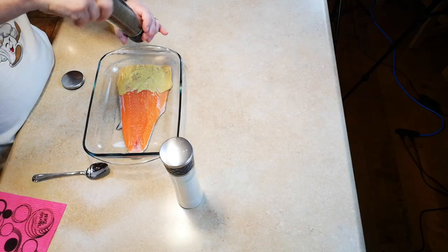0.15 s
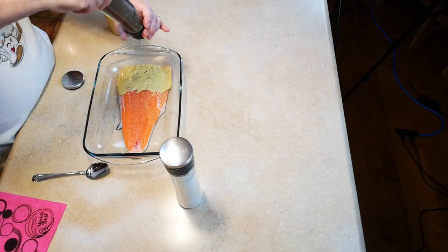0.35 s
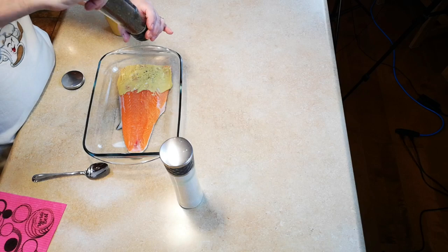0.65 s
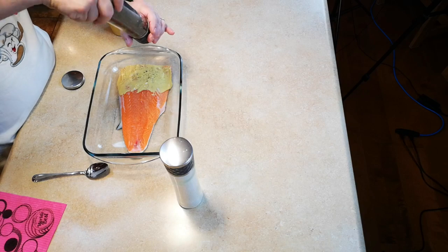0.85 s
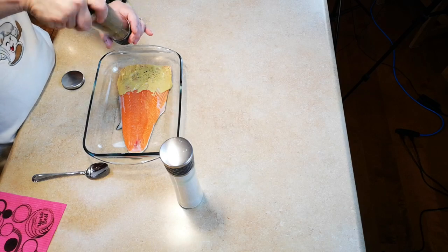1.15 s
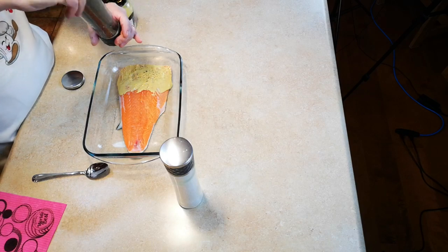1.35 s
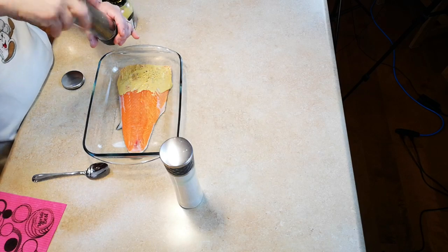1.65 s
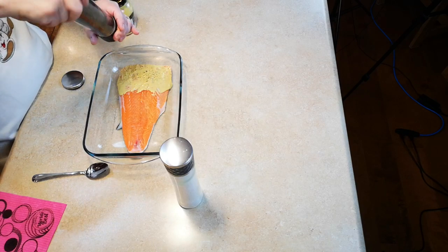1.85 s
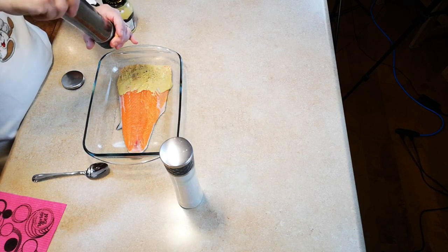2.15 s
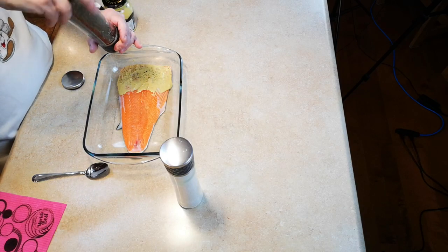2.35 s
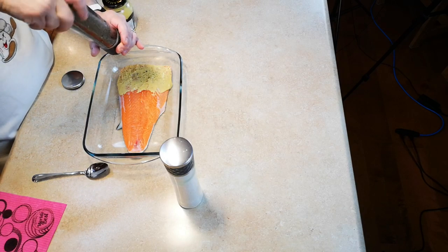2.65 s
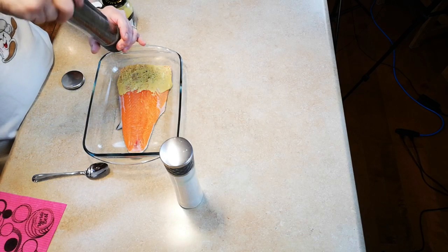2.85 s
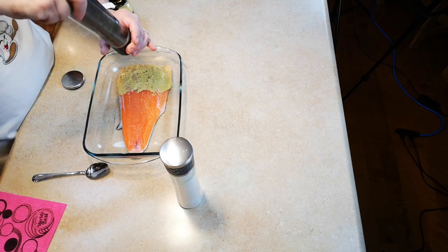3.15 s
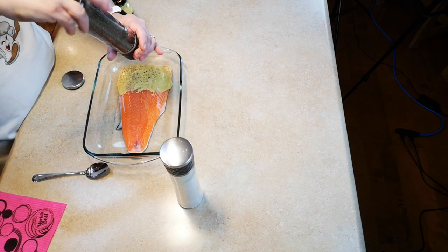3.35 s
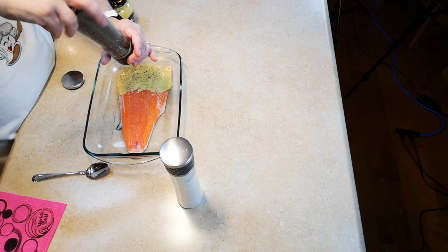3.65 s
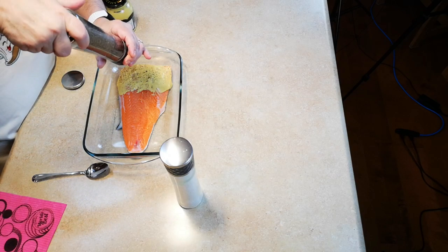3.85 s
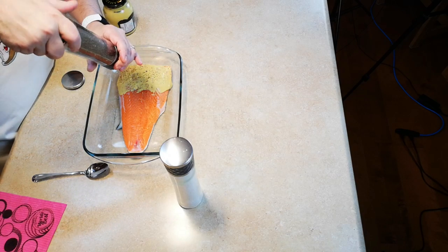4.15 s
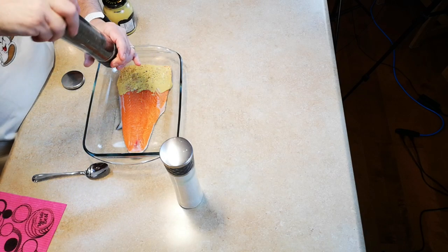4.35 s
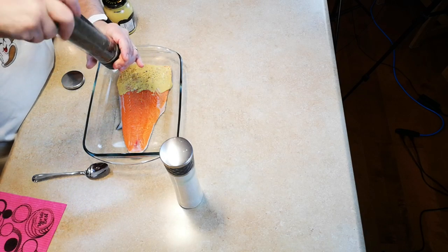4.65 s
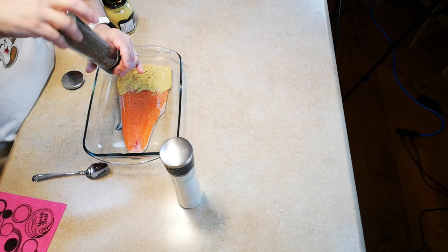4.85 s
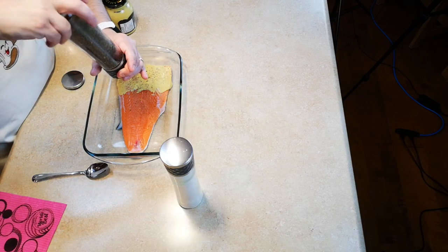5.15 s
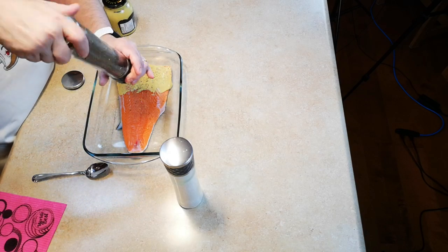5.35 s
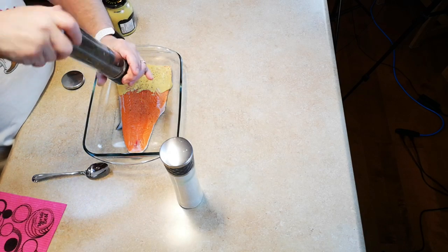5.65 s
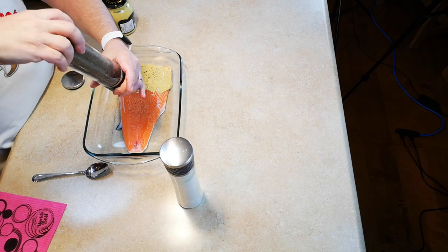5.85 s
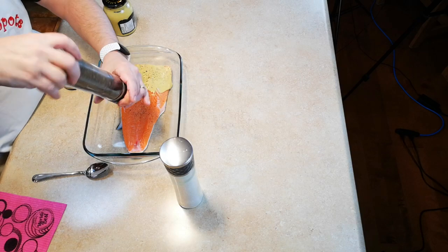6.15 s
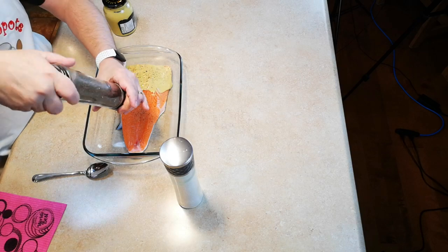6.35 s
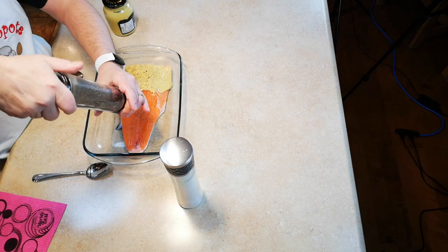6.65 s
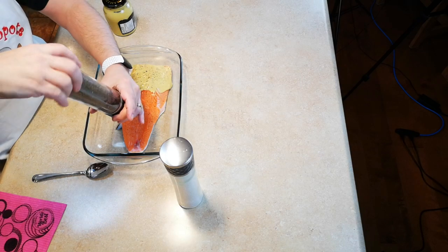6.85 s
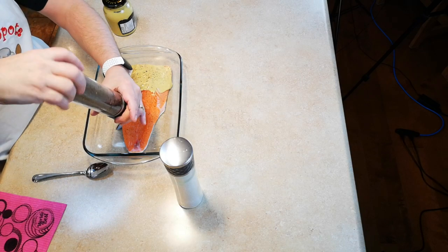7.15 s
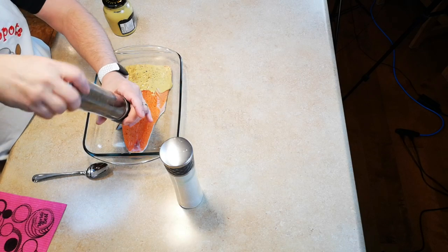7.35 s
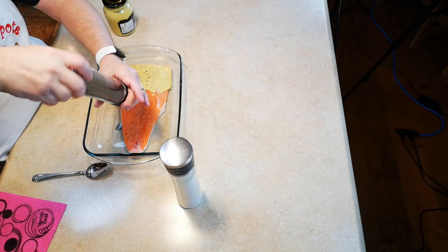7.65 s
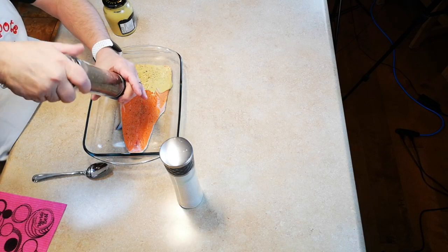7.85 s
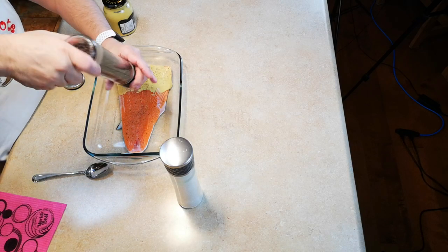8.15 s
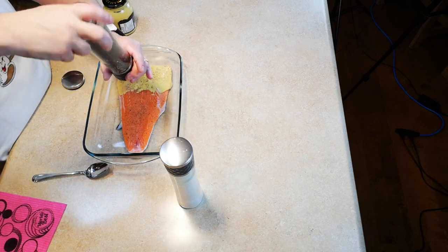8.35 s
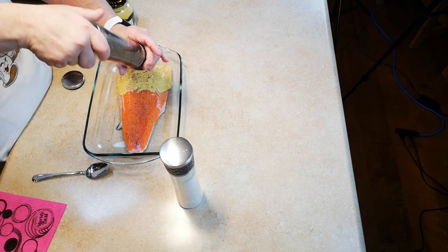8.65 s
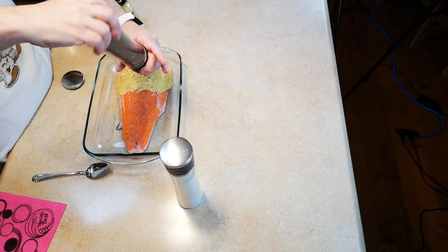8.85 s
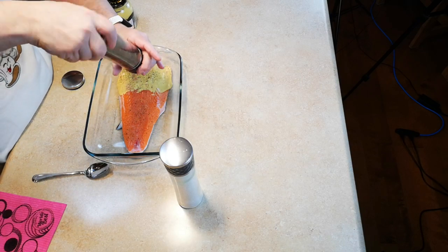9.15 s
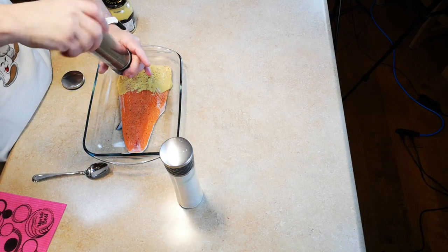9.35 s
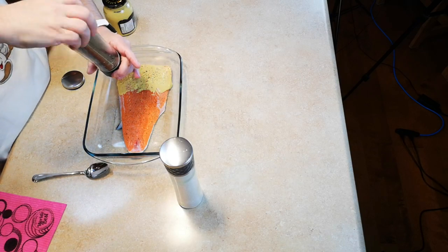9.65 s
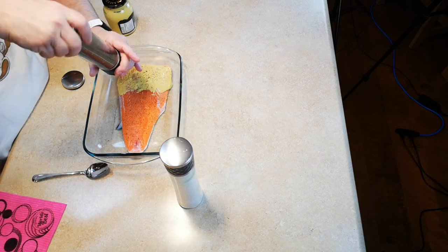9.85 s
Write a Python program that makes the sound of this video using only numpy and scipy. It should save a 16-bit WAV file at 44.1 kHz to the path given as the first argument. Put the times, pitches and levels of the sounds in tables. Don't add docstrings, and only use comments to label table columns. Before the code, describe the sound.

Close, dry, rhythmic rasps of a pepper grinder in a small kitchen, peppered with brittle snaps, faint grit hiss and soft counter bumps.

```python
import sys
import numpy as np
from scipy import signal
from scipy.fft import rfft, irfft, next_fast_len
from scipy.io import wavfile
from scipy.ndimage import uniform_filter1d

SR = 44100
rng = np.random.default_rng(int(sys.argv[2]) if len(sys.argv) > 2 else 0)


def generate_wav(signal):
    frames = np.transpose(np.atleast_2d(signal))
    scaled = np.clip(frames, -1, 1) * 32767
    pcm = np.round(scaled).astype(np.int16)
    wavfile.write(sys.argv[1], SR, pcm)


def voltage_ratio(decibels):
    exponent = np.asarray(decibels, float) / 20
    return 10 ** exponent


N = 440559

# (time [s], rise [s], hold [s], effort [dB])
TWISTS = [(0.007, 0.00083, 0.053, -34), (0.342, 0.04, 0.071, -33.5), (0.711, 0.059, 0.03, -32.5),
          (1.11, 0.0026, 0.066, -31), (1.459, 0.052, 0.063, -31), (1.828, 0.049, 0.047, -31),
          (2.177, 0.021, 0.045, -29), (2.506, 0.044, 0.056, -29.5), (2.842, 0.029, 0.074, -32),
          (3.166, 0.033, 0.064, -32.5), (3.486, 0.058, 0.029, -31.5), (3.795, 0.036, 0.038, -27),
          (4.092, 0.028, 0.077, -32.5), (4.392, 0.017, 0.088, -34.5), (4.677, 0.048, 0.038, -30),
          (4.965, 0.021, 0.017, -32.5), (5.261, 0.038, 0.06, -30.5), (5.645, 0.054, 0.05, -30),
          (5.978, 0.018, 0.054, -29.5), (6.286, 0.018, 0.064, -26), (6.588, 0.023, 0.037, -17.5),
          (6.903, 0.033, 0.042, -28), (7.205, 0.028, 0.046, -27.5), (7.51, 0.014, 0.077, -30.5),
          (7.807, 0.036, 0.043, -31), (8.121, 0.021, 0.0056, -33.5), (8.596, 0.04, 0.037, -28.5),
          (9.001, 0.0087, 0.075, -27), (9.356, 0.063, 0.024, -28), (9.717, 0.032, 0.044, -30.5)]
# (time [s], rise [s], hold [s], effort [dB])
REGRIPS = [(5.034, 0.0014, 0.0052, -25.5), (5.464, 0.044, 0.02, -34), (5.805, 0.061, 0.025, -29.5),
           (6.124, 0.027, 0.023, -33), (6.454, 0.0016, 0.059, -38.5), (6.74, 0.0025, 0.088, -40.5),
           (7.048, 0.0024, 0.065, -45), (7.35, 0.0088, 0.089, -45), (7.654, 0.031, 0.078, -47),
           (7.992, 0.0026, 0.062, -44.5), (8.228, 0.002, 0.018, -57), (8.557, 0.0074, 0.018, -48.5),
           (8.784, 0.023, 0.068, -48), (8.85, 0.0029, 0.0052, -39), (9.169, 0.042, 0.022, -40.5),
           (9.251, 0.027, 0.035, -45), (9.565, 0.012, 0.053, -40.5), (9.883, 0.026, 0.13, -46)]
# (time [s], hollow over bright [dB])
GRIP = [(0, 0), (.4, 2), (1.1, 3), (1.5, -2), (3.2, 1), (4.1, 0), (4.4, 3.5), (4.9, 2.5), (5.1, 0.5),
        (5.5, 2), (6.3, 2), (6.6, 2), (7.5, 3), (8.1, 6.5), (8.6, 3), (9.1, -2), (9.4, 5), (9.99, 0.5)]
# (frequency [Hz], density [dB per Hz])
SCRAPE = [(200, -22.5), (480, 0), (1200, -0.5), (3300, 0.5), (4300, 7), (6200, -10), (14000, -13.5)]
# (frequency [Hz], width [Hz], level [dB])
HOLLOW_MODES = [(420, 200, -23), (737, 200, -8), (1180, 220, -5), (1870, 98, -9.5), (2450, 300, -3),
                (2760, 96, -11)]
# (frequency [Hz], width [Hz], level [dB])
BURR_MODES = [(3740, 163, -9.5), (4100, 460, -1), (5010, 620, -1.5), (5050, 640, -14.5), (6380, 1200, -5.5)]
# (frequency [Hz], width [Hz], level [dB])
SHELL_MODES = [(7750, 2260, 10), (9600, 1200, -4), (13560, 1470, 8.5)]
# (time [s], peak [dB], ring [Hz], brightness [dB], second ring [Hz])
SPLITS = [(0.0105, -12, 4150, -5, 1260), (0.413, -14, 3530, -14, 2560), (0.4373, -15.5, 4030, -11, 2900),
          (0.7972, -14.5, 1250, -22, 1640), (1.1091, -3, 4430, -7.5, 1140), (1.522, -13.5, 4140, -22, 6040),
          (1.878, -15, 1300, -10, 2450), (2.2223, -13.0, 3620, -15, 2400), (2.525, -16, 2610, -22, 3900),
          (2.586, -11, 4160, -16, 2560), (3.254, -13, 4700, -12, 2820), (3.8404, -8.5, 2600, -18, 4340),
          (3.8562, -12, 2530, -15, 3890), (4.7528, -13, 3700, -9, 2040), (5.0359, -2, 2450, -8, 1090),
          (5.7133, -12, 5070, -11, 2450), (6.0114, -12, 3740, -7, 2580), (6.2988, -7, 2510, -13, 5600),
          (6.3037, -12, 1980, -14, 2730), (6.3331, -13, 1440, -9, 1050), (6.354, -8.5, 1580, -9, 3900),
          (6.3572, -8.5, 4140, -15, 1810), (6.3652, -6.5, 2570, -21, 4260), (6.5966, -5, 4140, -11, 5720),
          (6.6053, -11, 2370, -17, 4780), (6.6181, -1.5, 3900, -12, 1890), (6.625, -11, 2200, -6, 5160),
          (6.6309, -1, 2200, -8, 5270), (6.6465, -9.0, 4710, -9, 3380), (6.9347, -7, 5340, -14, 880),
          (6.9409, -11, 4000, -18, 2930), (6.9528, -9.5, 4300, -10, 2310), (7.2331, 1.5, 4100, -11.5, 2570),
          (7.2401, -11, 4050, -12, 2290), (7.246, -4.0, 4630, -12, 1900), (7.2513, -8.5, 4670, -4, 2820),
          (7.5493, -11, 2400, -17, 5010), (8.6015, 3.5, 4040, -7.5, 2220), (9.4287, -13.5, 1870, -9, 1290),
          (9.7534, -5, 3930, -17, 1680)]
# (time [s], peak [dB], ring [Hz], brightness [dB])
PIECES = [(1.5335, -16, 4200, -17), (1.5433, -19, 4100, -11), (2.2, -14, 2600, -11), (2.53, -17, 4030, -21),
          (2.5464, -19, 4170, -22), (2.554, -14.5, 2460, -20), (2.559, -17.5, 2460, -20),
          (2.5687, -13.5, 4150, -17), (2.576, -15, 3870, -13), (2.5787, -14.0, 2660, -15),
          (2.5987, -20, 2840, -13), (3.5312, -17, 2920, -11), (3.538, -19.5, 2190, -11),
          (3.846, -13, 2690, -17), (3.8508, -10.5, 2410, -14), (3.862, -15.5, 2600, -14),
          (3.8712, -19, 4280, -12), (4.73, -18, 2060, -25), (4.9966, -15, 1060, -17),
          (5.0504, -15, 3900, -2), (5.3017, -20, 2930, -16), (5.3101, -18, 5140, -19),
          (5.328, -18.0, 4220, -10), (5.3545, -17.5, 4350, -15), (5.515, -15.5, 5300, -21),
          (5.523, -18.5, 2470, -20), (5.6737, -17.5, 4050, -7), (5.682, -16, 2470, -14),
          (5.8849, -17, 2460, -2.5), (6.1644, -19.0, 2570, -10), (6.6376, -22, 2450, -10),
          (6.9455, -12, 4200, -15), (6.9729, -19, 4110, -8), (7.2204, -17, 4300, -14),
          (7.5543, -15.5, 1070, -8), (7.583, -17, 5120, -11), (7.8397, -19, 3700, -2),
          (7.8791, -22, 2360, -4), (8.645, -12, 4100, -17), (8.6547, -20, 4000, -14),
          (9.0151, -11, 4050, -23), (9.0291, -25, 3870, -18), (9.0431, -11, 4220, -16),
          (9.055, -16, 4830, -5), (9.0631, -16.0, 5140, -7), (9.0766, -15, 4190, -17),
          (9.747, -17.5, 3530, -3), (9.763, -20, 4700, -21), (9.8078, -15.5, 4130, -13),
          (9.8127, -15.5, 4270, -18)]
# (time [s], peak [dB], ring [Hz], brightness [dB])
CHIPS = [(0.038, -20, 4200, -14), (0.3883, -24, 2950, -6), (0.7696, -18, 3890, -11),
         (0.7753, -17.5, 1300, -12), (0.79, -18.5, 1780, -15), (1.506, -20.0, 4130, -21),
         (1.5137, -20.0, 4260, -14), (1.901, -20.0, 2970, -17), (1.9103, -19.5, 3660, -17),
         (2.208, -18.0, 2510, -14), (2.2137, -16.0, 3550, -17), (2.2426, -20, 4100, -18),
         (2.9326, -21, 1920, -14), (2.9447, -25, 4520, -5), (3.547, -19.0, 4500, -16),
         (3.5797, -15.5, 5460, -11), (4.157, -21, 4650, -15), (4.162, -17, 4600, -16),
         (4.7353, -19.0, 2190, -17), (4.7422, -21, 2430, -17), (5.691, -17, 2700, -12),
         (5.7022, -19, 2530, -14), (5.7078, -19, 4040, -20), (5.87, -18, 2430, -15),
         (5.8744, -20.5, 4260, -5), (5.9866, -20, 4170, -17), (5.9905, -20.5, 4150, -16),
         (6.0071, -18, 4760, -5.5), (6.028, -18.5, 4370, -12), (6.1607, -18, 2540, -16),
         (6.292, -15, 4060, -9), (6.3106, -26, 4170, -10), (6.3234, -26, 4000, -9), (6.96, -20, 4200, -6),
         (7.274, -22, 2650, -9), (7.294, -24, 960, -12), (7.5448, -18, 4090, -16), (7.852, -21.5, 4000, -7),
         (8.6222, -17.5, 2060, -16), (8.6334, -18, 1080, -14), (8.662, -17, 4470, -16),
         (9.0046, -19.5, 4170, -5), (9.0184, -16, 4170, -17), (9.0317, -17, 1200, -17),
         (9.068, -22, 5420, -13), (9.2225, -21, 3540, -16), (9.4118, -19, 3820, -8),
         (9.422, -19.0, 1160, -10), (9.7734, -18, 5100, -16), (9.7927, -24, 1310, -17)]
# (time [s], peak [dB], ring [Hz],
# brightness [dB])
TICKS = [(0.2061, -49.5, 4780, 17), (0.559, -30, 3380, -6), (0.7132, -33, 2340, -11), (1.336, -46, 4400, 3),
         (1.866, -22, 2400, -17), (2.057, -45, 5430, 11), (2.8372, -29.5, 4100, -13),
         (3.1874, -23, 2770, -9), (3.43, -44, 5530, 4), (3.5254, -22, 2660, -10), (3.9248, -36, 4190, 1),
         (4.1155, -25, 4450, 5), (4.3857, -27, 4240, -21), (4.982, -27, 890, -18), (5.2813, -26, 2670, -15),
         (5.648, -23, 4130, -8), (5.996, -26, 2410, -11), (7.227, -8, 4300, -14), (7.5311, -16, 4080, -9),
         (8.13, -29, 4000, 2), (8.1473, -22, 4000, -16), (8.359, -41, 834, -15), (0.7537, -27, 2430, 5),
         (8.5752, -28, 4220, -21), (8.853, -21.5, 3770, -4), (9.009, -20.5, 4050, 3),
         (9.2129, -21, 4500, -18), (9.229, -22, 3620, -12), (9.5484, -25, 4000, -20),
         (1.1166, -15, 4200, -6), (6.757, -29, 2500, -14), (6.765, -28, 4200, -12), (6.775, -25, 2600, -12),
         (6.848, -29, 4500, -8), (7.058, -27, 4800, -12), (7.142, -30, 4800, -6), (2.89, -30, 5200, -14),
         (2.907, -24, 4000, -14),
         (0.054, -28, 4300, -10), (0.3172, -47, 3440, 6), (1.0223, -50, 3700, 8), (1.414, -47, 2900, 3),
        (1.4745, -29, 4780, -5), (1.4907, -26, 5510, -14), (1.7821, -46, 5230, 0), (2.1345, -55, 3250, 2),
        (2.1388, -54, 4570, 4), (2.1616, -40.5, 2450, -8), (2.4735, -44, 5010, 9), (2.5151, -27, 3070, -15),
        (2.7872, -45, 5100, 3), (3.1943, -24, 810, -12), (3.4653, -38, 5270, 6), (4.0029, -38, 6110, 3.5),
        (4.4882, -27, 1126, -19), (4.503, -26, 4280, 0), (4.574, -40, 5360, 5), (4.6457, -43, 5270, -1),
        (4.695, -25, 2680, -11), (4.992, -17, 2900, -19), (5.238, -46, 1070, 9), (5.6512, -22, 2540, -13),
        (5.808, -30, 2630, -11), (6.4639, -25, 3530, -11), (6.5055, -26, 2140, -10),
        (7.8103, -27.5, 4730, -7), (8.1505, -33, 2750, -15), (8.401, -40, 5510, 3), (8.4975, -47, 4880, 12),
        (8.5702, -28, 4100, -12), (8.861, -23.5, 3830, -12), (8.9462, -37, 1420, -14),
        (9.1918, -24, 3500, -13), (9.3546, -26, 4040, -12), (9.372, -29, 1830, 6),
        (9.7146, -29.5, 2880, -14), (9.722, -29.5, 3600, -11), (9.9053, -32, 1890, -13)]
# (frequency [Hz], density [dB per Hz])
HISS = [(1500, -7), (2500, 3.5), (5000, 6.5), (7600, 2.5), (8500, 9), (9400, 6), (16000, -4)]
# (time [s], steady trickle [dB], shake by a stroke [dB])
TILT = [(0, -62, -40.5), (1, -58.5, -37), (2.1, -58.5, -40), (2.8, -55.5, -39), (4.002, -54, -38),
        (4.4, -61, -39.5), (5.2, -58, -39.5), (5.6, -53, -43.5), (6.1, -46, -40), (7.2, -42.5, -51),
        (7.351, -47, -43), (8.1, -47.5, -46), (8.26, -45, -71), (8.35, -61, -45), (8.45, -42, -67),
        (8.59, -61, -38), (9.3, -48, -45), (9.99, -75, -41)]
# (frequency [Hz], time to fall 60 dB [s])
KITCHEN_T60 = [(250, 0.62), (2000, 0.42), (15000, 0.23)]
# (frequency [Hz], density [dB per Hz])
AIR = [(30, 0.5), (70, -5.5), (150, -10), (400, -25.5), (5000, -36), (16000, -64)]
# (frequency [Hz], density [dB per Hz])
RUMBLE = [(3, -1.5), (7, 9), (11, 11), (16, -14), (24, -0.5), (45, -50.5)]
# (time [s], length [s], start pitch [Hz], end pitch [Hz], level [dB], load [ratio])
CREAKS = [
    (.322, .032, 700, 480, -52, .2),
    (1.058, .054, 503, 518, -43.5, 1.1),
    (3.476, .036, 820, 380, -48, .2),
    (3.499, .022, 900, 600, -49, .1),
]
# (time [s], peak [dB])
BUMPS = [
    (5.143, -21.5),
    (5.42, -24),
    (6.136, -27),
    (6.473, -32),
    (7.049, -24),
    (7.218, -40),
    (7.337, -29),
]
# (frequency [Hz], gain [dB])
MICROPHONE = [(7000, -2), (8300, 0), (9000, -2), (10900, -3), (12400, 0), (13600, 0.5), (14200, -21),
              (15700, -0.5)]
# (frequency [Hz], readiness to drop out [spreads of need])
DROPPED_TREBLE = [(9000, -1.4), (9800, -1.1), (10700, -.5), (11600, -1.1), (13800, -1.2), (14400, -.1),
                  (15000, .8), (15600, -.3)]


def evened(x):
    return x / np.sqrt(np.mean(x ** 2) + 1e-20)


def read(points, hz):
    f, value = np.transpose(points)
    return np.interp(np.log(hz + 1), np.log(f + 1), value)


def add(mix, s, sound):
    part = mix[round(s * SR):][:len(sound)]
    part += sound[:len(part)]


def coloured(spectrum):
    size = next_fast_len(N)
    white = rfft(rng.standard_normal(size))
    gain = voltage_ratio(read(spectrum, np.fft.rfftfreq(size, 1 / SR)))
    return evened(irfft(white * gain, size)[:N])


def wander(ms):
    size = max(round(ms * SR / 1000), 1)
    drift = uniform_filter1d(rng.standard_normal(N), size)
    return evened(uniform_filter1d(drift, size))


def patchy(x, spread_db):
    z = signal.stft(x, nperseg=256)[2]
    patches = uniform_filter1d(rng.standard_normal(z.shape), size=4, axis=0)
    patches = evened(uniform_filter1d(patches, size=8, axis=1))
    gain = voltage_ratio(spread_db * np.minimum(patches, 1.2))
    return evened(signal.istft(z * gain, nperseg=256)[1][:N])


def ring(modes, stretch, spread_db):
    t = np.arange(600) / SR
    hz, width, db = np.transpose(modes)[:, :, None]
    struck = voltage_ratio(db + spread_db * rng.uniform(-0.59, 1, hz.shape)) * rng.choice([-1, 1], hz.shape)
    width = np.maximum(width, 230)
    decay = np.exp(-np.pi * width * t) * np.minimum(t / .0001, 1)
    return (struck * decay * np.sin(2 * np.pi * hz * stretch * t)).sum(0)


def grains(modes, per_s, spread_db, count):
    strength = voltage_ratio(spread_db * np.minimum(rng.exponential(1, N), 1.6))
    clicks = strength * (rng.random(N) < per_s / SR)
    kind = rng.integers(0, count, N)
    total = np.zeros(N)
    for k in range(count):
        response = ring(modes, rng.uniform(1.0, 1.065), 7.1)
        total += signal.oaconvolve(clicks * (kind == k), response)[:N]
    return evened(total)


def grind():
    slips = voltage_ratio(5.5 * np.clip(wander(3), -3, 1))
    scrape = patchy(coloured(SCRAPE) * slips, spread_db=4)
    split_hz = 3150
    low = signal.sosfiltfilt(signal.butter(4, split_hz, fs=SR, output="sos"), scrape)
    hollow = voltage_ratio(-1.5) * low + voltage_ratio(-8.0) * grains(HOLLOW_MODES, per_s=600, spread_db=1.5, count=8)
    bright = voltage_ratio(-3.5) * (scrape - low) + voltage_ratio(-6.5) * grains(BURR_MODES, per_s=400, spread_db=1.0, count=6)
    return strained() * (effort() * [hollow, bright]).sum(0)


def effort():
    gain, splits = np.zeros((2, N)), np.transpose(SPLITS)[0]
    t = np.arange(SR // 2) / SR
    for strokes, fall_db_per_s in ((TWISTS, 420), (REGRIPS, 200)):
        for s, rise, hold, db in strokes:
            nearest = splits[np.argmin(abs(splits - s))]
            if rise < .005 and abs(nearest - s) < .02:
                s = nearest
            fall = fall_db_per_s + 16.6 * s
            shape = np.interp(t, [0, rise, rise + hold], [-17.5, 2, -2.5])
            shape = shape - fall * np.maximum(t - rise - hold, 0)
            hollow_db = np.interp(s, *np.transpose(GRIP)) - 0.18 * (db + 28.0)
            add(gain[0], s, voltage_ratio(db + hollow_db / 2 + shape))
            add(gain[1], s, voltage_ratio(db - hollow_db / 2 + shape))
    return gain


def strained():
    strain_s, strain_db = 0.0053, 0.5
    strain = np.zeros(N)
    for s, *_ in SPLITS + PIECES:
        add(strain, max(s - strain_s, 0), np.hanning(round(strain_s * SR) + 2) ** .5)
    return voltage_ratio(strain_db * np.minimum(strain, 1))


def crack(db, hz, bright_db, second_hz=None):
    t = np.arange(400) / SR
    snaps = 0.15 * np.clip(rng.standard_normal(400), -1.9, 1.9) ** 3 * np.exp(-t / 0.0032)
    snaps[0] = 1
    z = rfft(snaps, 2048)
    snaps = irfft(z / abs(z) ** .8)[:400] * np.exp(-t / .004)
    snaps = signal.lfilter([1, -1], [1, -.85], snaps)
    pitches = [(hz, 0)]
    if second_hz:
        pitches.append((second_hz, -5.5))
    parts = []
    for f, level in pitches:
        width = 263 + 0.08 * f
        parts.append((np.convolve(snaps, ring([(f, width, 0)], 1, 0)), level))
    near = [(f, width + 250, level - 1.9 * abs(np.log2(f / hz)))
            for f, width, level in HOLLOW_MODES + BURR_MODES]
    parts.append((np.convolve(snaps, ring(near + [(6820, 1430, -10)], 1, 1.1)), -2))
    body = sum(voltage_ratio(level) * part / abs(part).max() for part, level in parts)
    edge = np.convolve(snaps, ring(SHELL_MODES, 1, 3.0))
    return voltage_ratio(db) * (body / abs(body).max() + voltage_ratio(bright_db + 2.5) * edge / abs(edge).max())


def loose_corns():
    hiss = patchy(coloured(HISS) * voltage_ratio(2.0 * wander(4.0)), spread_db=2.5)
    ticks = grains(SHELL_MODES, per_s=1500, spread_db=2.5, count=5)
    return shaken() * (voltage_ratio(-1.5) * evened(hiss) + voltage_ratio(-5.5) * ticks)


def shaken():
    s, trickle_db, shake_db = np.transpose(TILT)
    power = voltage_ratio(2 * np.interp(np.arange(N) / SR, s, trickle_db))
    t = np.arange(SR // 2) / SR
    for start, rise, hold, db in TWISTS + REGRIPS:
        hold = hold + 0.03
        after = t - rise - hold
        shape = np.interp(t, [0, rise, rise + hold], [-12, -0.5, 0])
        shape -= 110 * np.maximum(after, 0)
        shape += -13 * np.clip((after - 0.092) / 0.017, 0, 1)
        level = np.interp(start, s, shake_db) + 0.51 * (db + 27.0)
        add(power, start, voltage_ratio(2 * (level + shape)))
    return np.sqrt(power)


def kitchen(x):
    taps = np.zeros(SR // 2)
    at = np.arange(250, SR // 2 - 20, 20)
    taps[at + rng.integers(0, 20, len(at))] = rng.choice([-1., 1.], len(at))
    hz, t, z = signal.stft(taps, SR, nperseg=256)
    decay = voltage_ratio(-60 * t / read(KITCHEN_T60, hz)[:, None])
    tail = signal.istft(z * decay, SR, nperseg=256)[1]
    return signal.oaconvolve(x, tail / np.linalg.norm(tail))[:N]


def still_air():
    return voltage_ratio(-49.5) * coloured(AIR) + voltage_ratio(-36.5) * coloured(RUMBLE)


def creak(length, start_hz, end_hz, db, load):
    u = np.arange(round(length * SR)) / (length * SR)
    hz = end_hz + (start_hz - end_hz) * (1 - u) ** 2
    unsteady = 1 + .08 * uniform_filter1d(rng.standard_normal(len(u)), size=100)
    phase = 2 * np.pi * (np.cumsum(hz * unsteady) / SR)
    overtones = sum(voltage_ratio(level) * np.cos(k * phase) for k, level in enumerate([-16, -1, -8, -2, -14], 2))
    tone = np.cos(phase) + load * u ** 1.5 * overtones
    return voltage_ratio(db) * tone * (.7 + load * u / 2) * signal.windows.tukey(len(u), .2)


def bump(db):
    t = np.arange(1200) / SR - .0125
    return voltage_ratio(db) * 0.5 * np.sin(2 * np.pi * 120 * t) * np.exp(-(t / 0.0038) ** 2)


def scene():
    mill, low = grind() + loose_corns(), np.zeros(N)
    for s, *row in SPLITS + PIECES + CHIPS + TICKS:
        add(mill, s, crack(*row))
    for s, *row in CREAKS:
        add(mill, s, creak(*row))
    for s, db in BUMPS:
        add(low, s, bump(db))
    return (mill + voltage_ratio(-13.5) * kitchen(mill) + low + still_air())[None]


def patchy_treble(x):
    hz, _, z = signal.stft(x, SR, nperseg=1024)
    z = z * voltage_ratio(read(MICROPHONE, hz))[:, None]
    moments = z.shape[1]
    bands = np.repeat(rng.standard_normal((65, moments)), 8, axis=0)[:len(hz)]
    busy = np.log(uniform_filter1d((abs(z[20:]) ** 2).sum(0), size=5) + 1e-9)
    room = .6 * evened(uniform_filter1d(rng.standard_normal(moments), size=5))
    room = room - .5 * np.roll(evened(busy - busy.mean()), 3)
    need = .6 * evened(uniform_filter1d(bands, size=9, axis=1))
    need = need + room * np.clip(hz / 5000 - 2, 0, 1)[:, None]
    treble = np.log((abs(z[200:]) ** 2).sum(0) + 1e-9)
    attack = np.diff(treble, prepend=0) > .9
    attack = attack | np.roll(attack, 1)
    weak = (need < read(DROPPED_TREBLE, hz)[:, None]) & (hz > 9000)[:, None] & ~attack
    dropped = weak | (hz > 15900)[:, None]
    return signal.istft(z * np.where(dropped, .003, 1), SR, nperseg=1024)[1][:N]


def top_cut(x):
    return signal.sosfilt(signal.butter(12, 16970, fs=SR, output="sos"), x)


def record(dry):
    limited = 1.017 * np.tanh(dry[0] / 0.94)
    mix = patchy_treble(limited)[None]
    return top_cut(mix)


dry = scene()
out = record(dry)
generate_wav(out)
```